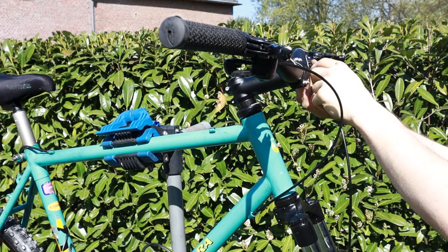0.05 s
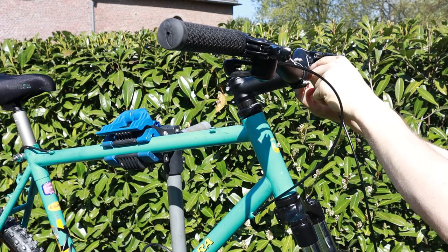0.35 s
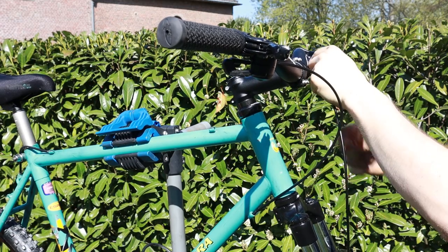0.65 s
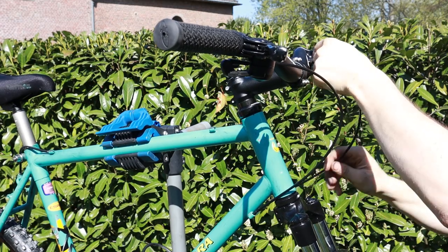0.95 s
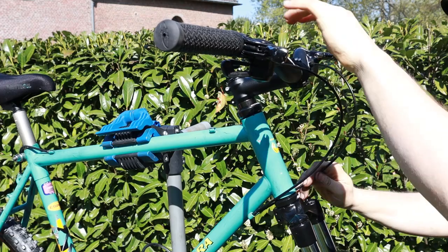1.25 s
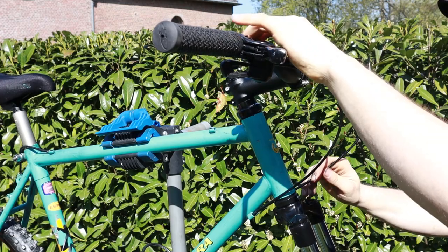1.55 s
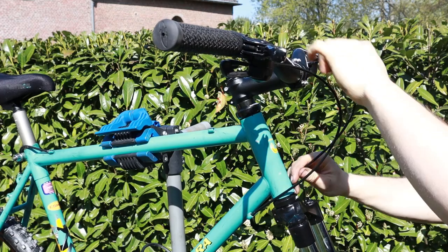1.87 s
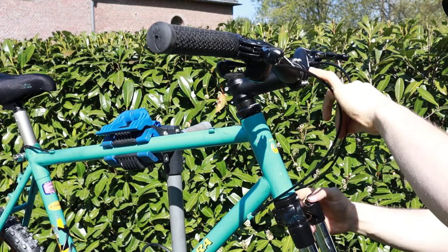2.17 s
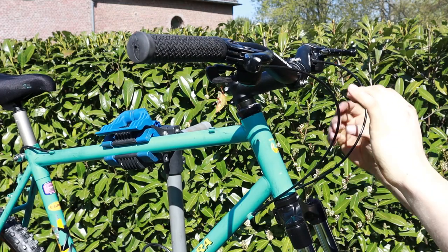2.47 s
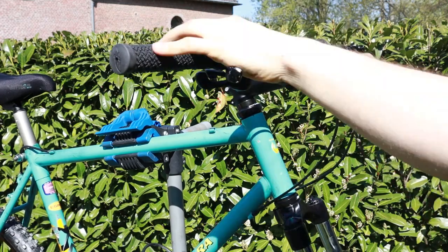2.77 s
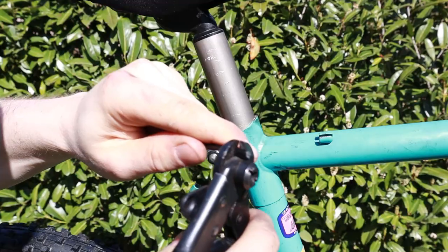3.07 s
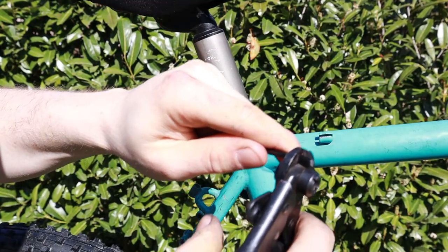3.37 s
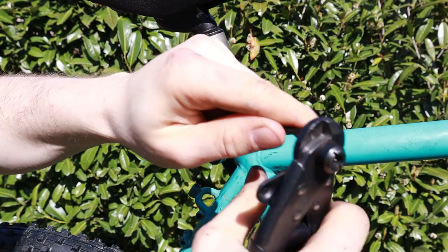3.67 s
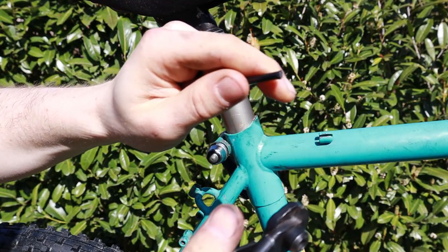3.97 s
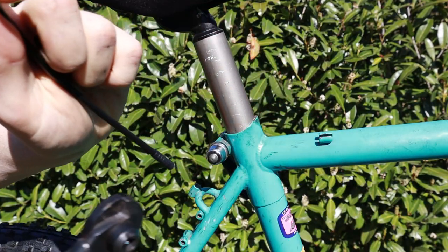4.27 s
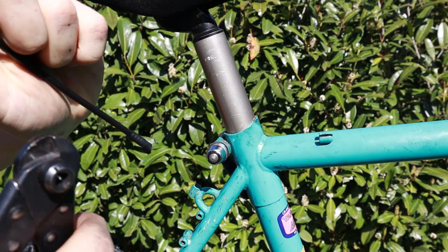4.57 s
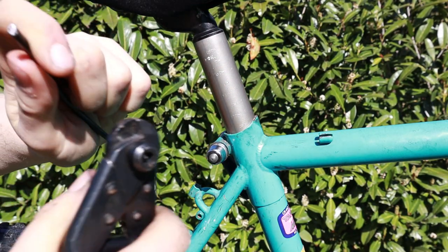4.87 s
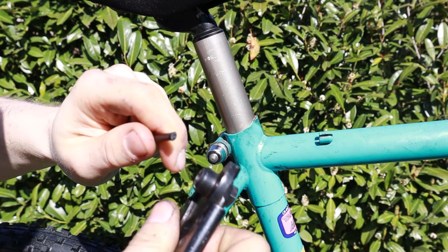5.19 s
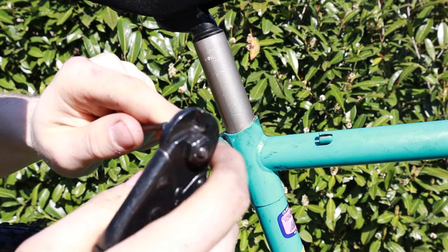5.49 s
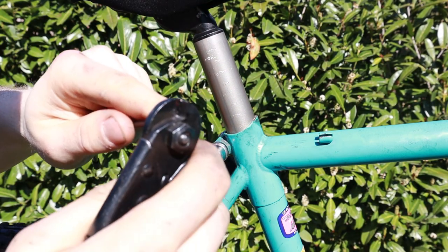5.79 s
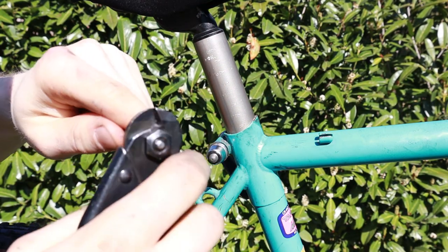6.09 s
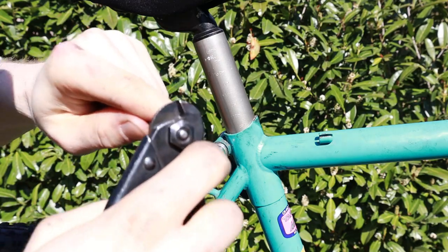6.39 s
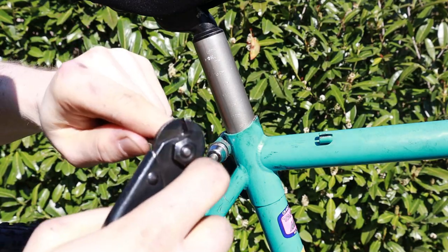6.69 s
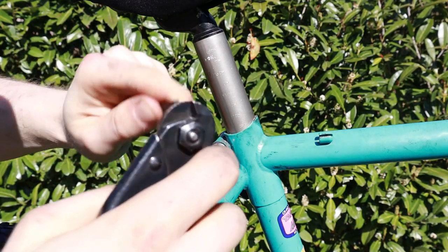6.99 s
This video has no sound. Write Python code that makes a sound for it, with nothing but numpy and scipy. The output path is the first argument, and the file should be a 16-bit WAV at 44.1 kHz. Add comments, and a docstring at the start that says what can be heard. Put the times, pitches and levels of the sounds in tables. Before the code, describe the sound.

A quiet garden, with a low rumble and wash of distant traffic, softly rustling leaves and faint far bird whistles throughout. At about 0.5 seconds a loose cable ticks against a bicycle, close by, with more light ticks near 1.4 and 1.8 seconds. From about 0.7 seconds a songbird sings high slurred notes, then a louder row of hooked notes sinking in pitch, ending in a tumbling trill by 3 seconds. At 3.7 seconds cable cutters snip the brake housing: a quick crack and a metallic snap of the jaws, close, nearly dry and by far the loudest sound. The housing slides faintly through fingers, and a few more ticks come between 4.3 and 5 seconds. Distant birds whistle and twitter from about 4 to 6 seconds, thinning to a few soft slurred notes until the end at around 7 seconds.

```python
"""A garden: distant traffic rumbles and washes throughout, leaves rustle, far birds whistle.
From 0.5 s a loose cable ticks against a bicycle as it is handled. One songbird sings a falling song:
slurs, hooked notes, a tumbling trill. At 3.7 s cable cutters snip the brake housing: the sheath
cracks, the steel strands part, the jaws snap shut. Far whistles, twitter, a few more ticks and
soft slurs follow."""
import sys
import numpy as np
from scipy import signal
from scipy.fft import rfft, irfft
from scipy.io import wavfile

SR = 44100
rng = np.random.default_rng(int(sys.argv[2]) if len(sys.argv) > 2 else 0)


def persist_wave(psi):
    """Save psi, clipped to +-1, as 16-bit WAV."""
    counts = np.round(np.clip(psi, -1, 1) * 32767).astype(np.int16)
    wavfile.write(sys.argv[1], SR, np.atleast_2d(counts).T)


N = 314874
TIME = np.arange(N) / SR

# Table levels are relative; gains follow in the functions.
# distant traffic: time_s, rumble_db, wash_db
TRAFFIC_LEVELS = [(0, -51, -49.5), (.8, -47, -50), (2.2, -48, -48), (3.2, -46.5, -47), (6.3, -47, -48),
                  (7.14, -45.5, -47)]
# traffic rumble: freq_hz, density_db
RUMBLE_SPECTRUM = [(12, -38), (20, -17), (42, -0.5), (60, 4), (119, -5.5), (189, -8), (315, -17),
                   (400, -35), (520, -35.5), (880, -120)]
# far tyres, wind in trees: freq_hz, density_db
WASH_SPECTRUM = [(200, -11.5), (400, -1), (600, 1.5), (950, 2.5), (1300, -1.5), (1800, -7.5), (2500, -17.5),
                 (4000, -24.5), (7000, -32), (12000, -34), (14500, -51.5), (16000, -53)]
# far motor: freq_hz, level_db
MOTOR_PARTIALS = [(55, -58.5), (149, -63.5)]
# motor swell: time_s, gain_db
MOTOR_SWELL = [(0, 5), (2.8, -6.5), (3.7, 3), (5.2, 7.5), (6.2, -18), (7.14, -1.5)]
# leaves and sleeves: freq_hz, density_db
RUSTLE_SPECTRUM = [(900, -1.5), (1800, 9.5), (2400, 7.5), (3500, -1.5), (6000, -14), (9000, -24.5),
                   (16000, -31)]
# housing sliding through fingers: freq_hz, density_db
SLIDE_SPECTRUM = [(2000, -7.5), (4000, 6), (7000, 1.5), (11000, -1.5), (16000, -6.5)]
# strokes of that slide: middle_s, length_s, level_db
SLIDE_STROKES = [(0.483, 0.082, -74), (2.892, .05, -62), (3.46, 0.3, -66), (3.78, 0.085, -58.5),
                 (4.026, 0.21, -67), (4.24, .2, -70), (5.02, .05, -69), (5.227, .1, -69),
                 (6.83, 0.072, -74.5)]
# bird whistles: start_s, length_s, pitch_hz, glide_hz, level_db, roughness
WHISTLE_NOTES = [(0.124, 0.22, 5650, -50, -65.5, .15), (0.374, 0.12, 4780, 702, -62.5, .2),
                 (0.684, 0.13, 4610, 197, -62, 0.25), (1.316, 0.069, 6870, -1050, -52, 0.2),
                 (1.43, .12, 6430, 98, -54.5, .25), (4.153, 0.097, 5355, 0, -57, 0.26),
                 (4.381, 0.074, 5360, 448, -60.5, 0.45), (4.501, 0.053, 5960, -500, -65, .7),
                 (4.633, .14, 3060, 600, -61, .25), (4.74, 0.08, 5800, -50, -57.5, 0.2),
                 (4.836, 0.038, 5050, 500, -59.5, 0.48), (4.888, .061, 5700, 300, -60, 0.23),
                 (5.183, 0.081, 4920, -150, -59, 0.35), (5.351, 0.092, 3880, -130, -60, 0.24),
                 (5.356, 0.07, 4980, -400, -55, .7), (5.505, .13, 4020, 300.5, -66, 0.14),
                 (5.609, 0.097, 6100, 900, -63.5, .5), (5.699, .2, 3410, -130, -68.5, 0.19),
                 (6.0, .13, 5180, 80, -74, .15)]
# cable and fingers touching the bike: start_s, level_db, centre_hz, t60_s
CABLE_TICKS = [(0.5264, -26, 2100, 0.029), (1.341, -38, 3000, .012), (1.363, -30.5, 3040, 0.019),
               (1.832, -36, 2700, 0.017), (3.347, -49, 9200, 0.018), (3.789, -39, 5960, 0.013),
               (4.261, -42, 5000, .012), (4.3487, -25, 6900, 0.0081), (4.717, -33, 4960, 0.024),
               (5.01, -39, 2880, 0.013), (6.082, -50, 4000, .01), (7.035, -47, 4920, 0.013)]
# cable and fittings: freq_hz, level_db, t60_s
CABLE_RESONANCES = [(2630, -10.5, .025), (3150, -8, 0.017), (5150, -4, 0.011), (6640, -14, 0.018),
                    (9040, -6, .012)]
# songbird's slurs: start_s, length_s, settled_hz, drop_hz, level_db
SONG_SLURS = [(0.66, 0.16, 5700, 1120, -57), (0.886, 0.14, 5860, 1624, -48), (1.088, 0.056, 4760, 500, -56),
              (1.125, 0.082, 5540, 1860, -50.5), (1.593, 0.095, 6850, 755, -47),
              (5.885, .08, 4680, 1500, -65), (6.291, .06, 5300, 1500, -72), (6.679, .08, 3910, 1500, -65.5),
              (7.015, 0.12, 4620, 1300, -65.5)]
# hooked notes: start_s, level_db
SONG_HOOKS = [(1.231, -46), (1.408, -42), (1.581, -39), (1.763, -38), (1.945, -37.5), (2.131, -36),
              (2.313, -36.5)]
# trill notes: start_s, level_db
SONG_TUMBLES = [(2.464, -36.5), (2.582, -37.5), (2.698, -38), (2.803, -38), (2.912, -39.5)]
# sheath cracking under the jaws: start_s, level_db
SHEATH_CRACKS = [(3.6715, -16.5), (3.6772, -9.5), (3.6849, -10)]
# fracture: freq_hz, density_db
FRACTURE_SPECTRUM = [(200, -25), (700, -17.5), (1200, 1), (1900, 4), (2400, 1.5), (2750, -12.5), (3200, 3),
                     (5000, -5.5), (7000, -4.5), (11000, -5.5), (15000, -2.5), (17000, -11.5)]
# cutter steel: freq_hz, level_db, t60_s
STEEL_RESONANCES = [(1270, -13, 0.11), (1440, -8, 0.018), (1668, -2.5, 0.039), (1920, -3.5, 0.032),
                    (1950, -7, 0.05), (2090, -9, 0.035), (3200, -4, 0.028), (3480, -8, .045),
                    (3920, -9, .04), (4500, -11.5, .05), (4740, -7, 0.037), (5950, -13.5, 0.052),
                    (7330, -6, 0.044), (8540, -4, .045), (9800, -10.5, .04), (12600, -13.5, 0.049),
                    (13200, -9.5, .045), (14450, -12.5, .045), (15110, -11.5, .045)]
# splitting sheath: freq_hz, level_db, t60_s
SHEATH_RESONANCES = [(1450, -16.5, 0.017), (1850, -17, .025), (3300, -13, 0.013)]
# strand bundles giving way: start_s, level_db, length_s
STRAND_BUNDLES = [(3.7092, -20, .0005), (3.7112, -12.5, .0015), (3.7162, -15, .0005), (3.7185, -5, .0035)]
# jaws and hand-damped grips: freq_hz, level_db, t60_s
GRIP_RESONANCES = [(152, -26.5, 0.037), (264, -18.5, .034), (670, -19.5, 0.026), (1400, -23, 0.011),
                   (1856, -16, .022), (2400, -17.5, 0.023), (3860, -8.5, 0.014), (4920, -10.5, 0.013),
                   (5834, -7.5, 0.0054)]


def from_db(db):
    """Decibels to gain."""
    return 10 ** (np.asarray(db) / 20)


def unit_rms(x):
    """Scale to rms 1."""
    return x / np.sqrt(np.mean(x ** 2) + 1e-20)


def per_sample(rows):
    """Curve columns interpolated at every sample."""
    time_s, *columns = np.transpose(rows)
    return [np.interp(TIME, time_s, column) for column in columns]


def add(out, start_s, sound):
    """Mix a sound in at start_s."""
    at = max(0, round(start_s * SR))
    out[at:at + len(sound)] += sound[:max(0, N - at)]


def drift(rate_hz, size=N):
    """Smooth random curve, spread near 1."""
    steps = np.arange(size) * rate_hz / SR
    return np.interp(steps, np.arange(4096), rng.standard_normal(4096))


def progress(length_s):
    """0 to 1 over a note."""
    return np.linspace(0, 1, int(length_s * SR))


def arch(u):
    """Parabola: 0 at the ends, 1 midway."""
    return 4 * u * (1 - u)


def colour(x, spectrum, size=16384):
    """Minimum-phase filter, unit power gain."""
    hz, db = np.transpose(spectrum)
    log_grid = np.log(np.maximum(np.arange(size // 2 + 1) * SR / size, 1))
    log_knots = np.log(np.r_[hz[0] / 2, hz, hz[-1] * 2])
    gain_db = np.interp(log_grid, log_knots, np.r_[db[0] - 20, db, db[-1] - 40])
    cepstrum = irfft(np.log(unit_rms(from_db(gain_db))))
    cepstrum[1:size // 2] *= 2
    cepstrum[size // 2 + 1:] = 0
    return signal.fftconvolve(x, irfft(np.exp(rfft(cepstrum))))[:len(x)]


def burst(t60_s, edge_db=4, edge_t60_s=.0011):
    """Crack: hard edge, then a dying spray of micro-impacts."""
    t = TIME[:SR // 10]
    envelope = from_db(-60 * t / t60_s) + from_db(edge_db - 60 * t / edge_t60_s)
    return rng.choice([-1, 1], len(t)) * envelope


def ring(modes, spread_db):
    """One blow on damped modes, each at a random strength."""
    t = TIME[:SR // 5]
    return sum((-1) ** k * from_db(db + spread_db * rng.normal() - 60 * t / t60_s)
               * np.sin(2 * np.pi * hz * t) for k, (hz, db, t60_s) in enumerate(modes))


def scatter(x, t60_s, onset_s):
    """Diffuse reflections from hedge, walls and trees."""
    t = TIME[:SR]
    build_up = 1 - np.exp(-(t / onset_s) ** 2)
    tail = rng.standard_normal(SR) * from_db(-60 * t / t60_s) * build_up
    return signal.fftconvolve(x, tail / np.sqrt(np.sum(tail ** 2)))[:N]


def traffic():
    """Distant rumble; wash of tyres and wind."""
    rumble_db, wash_db = per_sample(TRAFFIC_LEVELS)
    rumble = from_db(rumble_db + .8) * colour(rng.standard_normal(N), RUMBLE_SPECTRUM)
    wash = from_db(wash_db - .8) * colour(rng.standard_normal(N), WASH_SPECTRUM)
    return rumble + wash


def motor(waver_db=2, waver_rad=1.2):
    """Far hum, wavering in level and phase."""
    hum = sum(np.sqrt(2) * from_db(db + waver_db * drift(3.6))
              * np.sin(2 * np.pi * hz * TIME + waver_rad * drift(8.2)) for hz, db in MOTOR_PARTIALS)
    return hum * from_db(per_sample(MOTOR_SWELL)[0])


def rustle(peak_s=3.4, peak_db=-56.5, rest_db=-75, rise_db_per_s=5.2, fall_db_per_s=10.5):
    """Leaves and sleeves: hiss that swells once and sinks to rest."""
    hiss = colour(rng.standard_normal(N), RUSTLE_SPECTRUM)
    t = TIME - peak_s
    swell = from_db(peak_db + np.minimum(rise_db_per_s * t, -fall_db_per_s * t))
    return np.hypot(from_db(rest_db), swell) * from_db(.8 * drift(30)) * hiss


def housing_slide(grain_db=-6, catches_per_s=500, rest_db=-86):
    """Housing brushes through the fingers in strokes, with tiny catches; never quite still."""
    catches = (rng.random(N) < catches_per_s / SR) * rng.choice([-1, 1], N)
    strength = from_db(4 * np.minimum(rng.exponential(1, N), 3))
    grains = unit_rms(signal.fftconvolve(catches * strength, burst(t60_s=.006))[:N])
    friction = colour(rng.standard_normal(N) + from_db(grain_db) * grains, SLIDE_SPECTRUM)
    strokes = sum(from_db(db) * np.exp(-(2 * (TIME - middle_s) / length_s) ** 2)
                  for middle_s, length_s, db in SLIDE_STROKES)
    return (from_db(rest_db) + strokes) * from_db(1.1 * drift(60)) * friction


def bird_tone(hz, db, roughness, overtone_db=-33):
    """Sine plus faint third harmonic; roughness (0-1) flutters pitch and level."""
    size = len(hz)
    jitter = 1 + .075 * roughness * drift(900, size)
    phase = 2 * np.pi * np.cumsum(hz * jitter) / SR
    flutter_db = (1.2 + 3 * roughness) * drift(350, size)
    tone = np.sin(phase) + from_db(overtone_db) * np.sin(3 * phase) * (hz < SR / 6)
    return from_db(db + flutter_db) * tone * signal.windows.tukey(size, .08)


def bird_whistles(notes, arch_hz=224, warble_hz=39.5, warble_depth=.0066, gain_db=-.5):
    """Short arched, warbling whistles: mostly far birds, plus one high falling songbird note."""
    out = np.zeros(N)
    for start_s, length_s, pitch_hz, glide_hz, db, roughness in notes:
        u = progress(length_s)
        hz = pitch_hz + glide_hz * (u - .5) - arch_hz * (1 - arch(u))
        depth = warble_depth * (1 + drift(14, len(u)))
        warble = depth * np.sin(2 * np.pi * warble_hz * TIME[:len(u)])
        add(out, start_s, bird_tone(hz * (1 + warble), db + gain_db, roughness) * arch(u))
    return out


def cable_ticks(band_ratio=1.57, gain_db=-2, touches_from_s=1.9, touch_count=7):
    """Ticks and faint random touches ring the cable, each in its own frequency band."""
    out = np.zeros(N)
    touches = [(s, -59.5, 8000, .011) for s in rng.uniform(touches_from_s, N / SR, touch_count)]
    for start_s, db, centre_hz, t60_s in CABLE_TICKS + touches:
        edges_hz = [centre_hz / band_ratio, min(centre_hz * band_ratio, .45 * SR)]
        band = signal.butter(2, edges_hz, "band", fs=SR, output="sos")
        contact = burst(t60_s)
        cable = ring(CABLE_RESONANCES, spread_db=.5)[:len(contact)]
        add(out, start_s, from_db(db + gain_db) * signal.sosfilt(band, contact + cable))
    return out


def slur(length_s, settled_hz, drop_hz, settle_share=.14, attack_s=.0062, fade_db=3):
    """Whistle that swells while dropping onto its pitch, then fades a little."""
    u = progress(length_s)
    hz = settled_hz + drop_hz * np.exp(-u / settle_share)
    attack = 1 - np.exp(-u * length_s / attack_s)
    return bird_tone(hz, -fade_db * u, roughness=.22) * attack


def peep(length_s=.038, top_hz=9600, depth=.42, level_db=-25.5):
    """Thin, high arch leading into a hook."""
    hz = top_hz * (1 - depth * (1 - arch(progress(length_s))))
    return bird_tone(hz, level_db, roughness=.25)


def hook(base_hz, sweep_s=.05, buzz_s=.023, end_s=.024, swell_db=22):
    """Clean note scoops down, whips up, falls as a rough buzz, closes on a short note."""
    u = progress(sweep_s)
    sweep_hz = base_hz * (1 + .076 * (1 - u) ** 4 + .84 * u ** 5.2)
    sweep = bird_tone(sweep_hz, 3 + swell_db * (arch(u ** 1.45) - 1), roughness=.04 + .82 * u ** 6)
    u = progress(buzz_s)
    buzz = bird_tone(base_hz * (1.5 - .63 * u ** 2), -12 + 10 * arch(u), roughness=1)
    u = progress(end_s)
    end_hz = np.full_like(u, 1.13 * base_hz)
    end = bird_tone(end_hz, 2 - swell_db * u ** 3, roughness=.77 * (1 - u) ** 2)
    return np.concatenate([sweep, buzz, end])


def tumble(length_s=.058, top_hz=4820, octaves_per_s=26, break_s=.029, jump_share=.26, swell_db=11):
    """Note falls steeply, catches, jumps up, falls on; hoarse at the ends, clearer where loud."""
    u = progress(length_s)
    t = u * length_s
    effort = arch(u ** .98)
    hz = top_hz * 2 ** (-octaves_per_s * t) * (1 + jump_share * (t > break_s))
    catch_db = 9 * np.exp(-((t - break_s) / .004) ** 2)
    return bird_tone(hz, -1 + swell_db * (effort - 1) - catch_db, roughness=.8 * (1 - .65 * effort))


def songbird(first_hook_hz=4100, sag_hz_per_s=720, peep_lead_s=.033):
    """Slurs, hooks sinking in pitch, a tumbling trill; later a few soft slurs."""
    out = np.zeros(N)
    for start_s, length_s, settled_hz, drop_hz, db in SONG_SLURS:
        add(out, start_s, from_db(db) * slur(length_s, settled_hz, drop_hz))
    for start_s, db in SONG_HOOKS:
        base_hz = first_hook_hz - sag_hz_per_s * (start_s - SONG_HOOKS[0][0])
        add(out, start_s - peep_lead_s, from_db(db) * peep())
        add(out, start_s, from_db(db) * hook(base_hz))
    for start_s, db in SONG_TUMBLES:
        add(out, start_s, from_db(db) * tumble())
    return out


def fracture(treble_db, crack_db=-9, steel_db=-28, shelf_hz=6000):
    """One crack rings the cutter steel; a shelf sets its treble."""
    crack = from_db(crack_db) * colour(burst(t60_s=.014, edge_db=-1.5), FRACTURE_SPECTRUM)
    steel = from_db(steel_db) * ring(STEEL_RESONANCES, spread_db=.5)
    hit = np.pad(crack, (0, len(steel) - len(crack))) + steel
    treble = signal.sosfilt(signal.butter(1, shelf_hz, "high", fs=SR, output="sos"), hit)
    return hit + (from_db(treble_db) - 1) * treble


def snip(strand_gap_s=.001, snap_s=3.7255, snap_db=1, grip_db=2):
    """Sheath cracks, strands part in quick runs, jaws snap shut and jolt the grips."""
    out = np.zeros(N)
    for start_s, db in SHEATH_CRACKS:
        add(out, start_s, from_db(db) * fracture(treble_db=-2))
    for start_s, db, length_s in STRAND_BUNDLES:
        for lag_s in np.arange(0, length_s, strand_gap_s):
            add(out, start_s + lag_s, from_db(db) * fracture(treble_db=2.5))
    add(out, snap_s, from_db(snap_db) * fracture(treble_db=-1.5))
    for start_s, db in SHEATH_CRACKS:
        add(out, start_s, from_db(db) * ring(SHEATH_RESONANCES, spread_db=1))
    add(out, snap_s, from_db(grip_db) * ring(GRIP_RESONANCES, spread_db=1.5))
    return out


def twitter_notes(from_s=3.85, to_s=5.2, count=24, low_hz=3190, high_hz=6470, glide_hz=1010):
    """Faint whistle rows: loose timing, random pitch and glide."""
    step_s = (to_s - from_s) / count
    notes = []
    for k, (late, high, up) in enumerate(rng.random((count, 3))):
        pitch_hz = low_hz + (high_hz - low_hz) * high
        notes.append((from_s + step_s * (k + late), .05, pitch_hz, glide_hz * (2 * up - 1), -68.5, .3))
    return notes


def scene():
    """Work close and nearly dry; birds blurred by foliage, echoed by trees. Mono."""
    work = snip() + cable_ticks()
    song = songbird()
    whistles = bird_whistles(WHISTLE_NOTES + twitter_notes())
    # far reflections lose treble
    dulled = signal.sosfilt(signal.butter(1, 4500, fs=SR, output="sos"), work)
    near = (work + from_db(-16) * scatter(work, t60_s=.056, onset_s=.0062)
            + from_db(-37.5) * scatter(dulled, t60_s=.45, onset_s=.023))
    singer = (from_db(-4) * song + from_db(-8.5) * scatter(song, t60_s=.09, onset_s=.0024)
              + from_db(-10) * scatter(song, t60_s=.56, onset_s=.018))
    birds = (from_db(-.5) * whistles + from_db(-3.5) * scatter(whistles, t60_s=.055, onset_s=.003)
             + from_db(-3) * scatter(whistles, t60_s=.79, onset_s=.014))
    return (near + singer + birds + housing_slide() + rustle() + traffic() + motor())[None]


def record(dry, ceiling=.82, stopband_hz=16850):
    """Soft clip, then steep low-pass."""
    lowpass = signal.cheby2(20, 100, stopband_hz, fs=SR, output="sos")
    return signal.sosfilt(lowpass, ceiling * np.tanh(dry / ceiling))


dry = scene()
out = record(dry)
persist_wave(out)
```